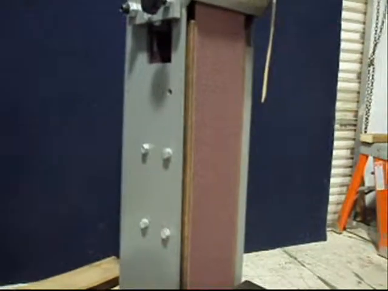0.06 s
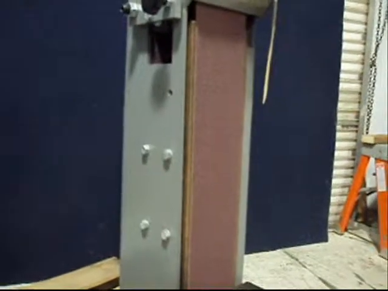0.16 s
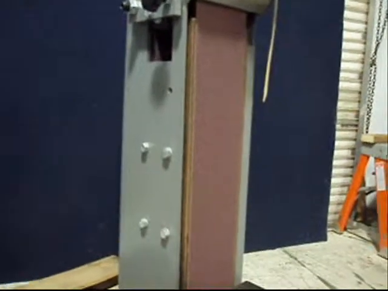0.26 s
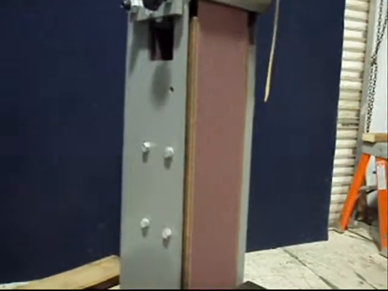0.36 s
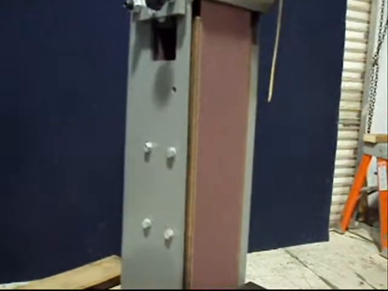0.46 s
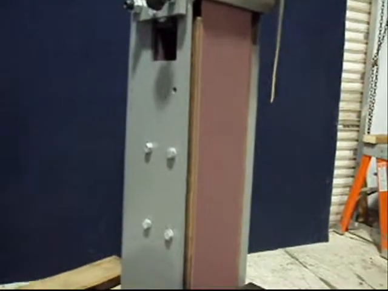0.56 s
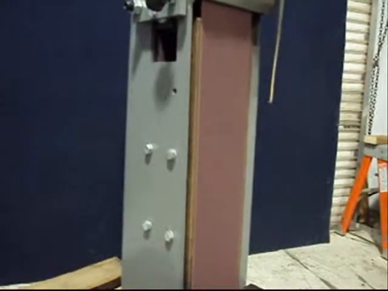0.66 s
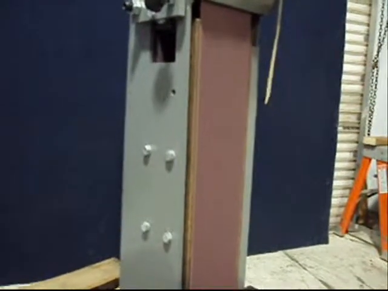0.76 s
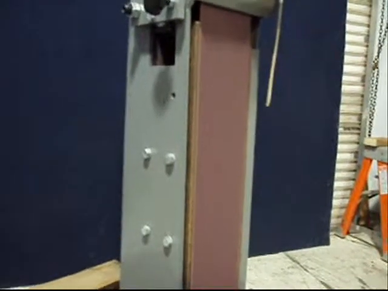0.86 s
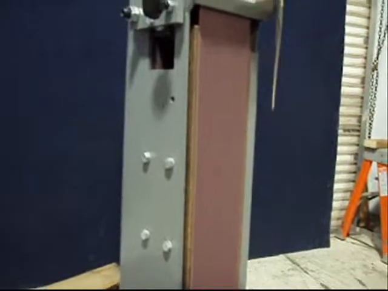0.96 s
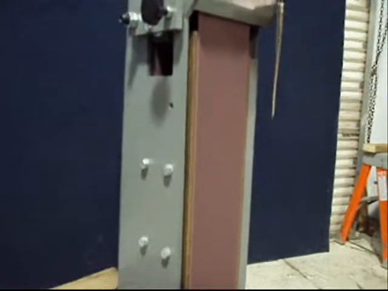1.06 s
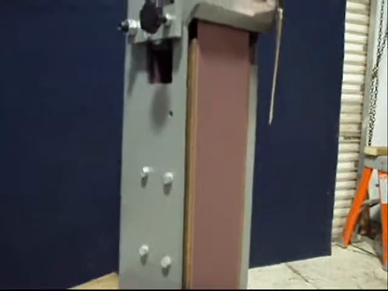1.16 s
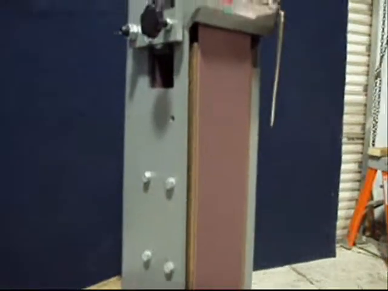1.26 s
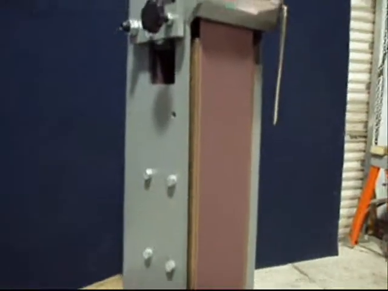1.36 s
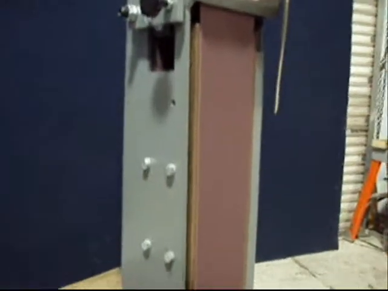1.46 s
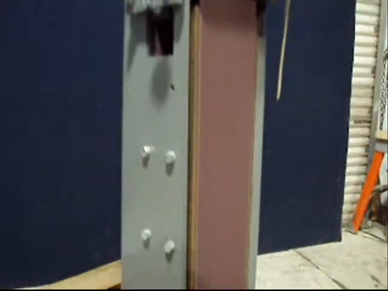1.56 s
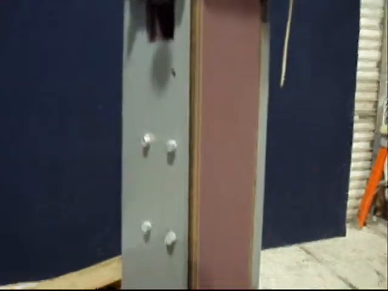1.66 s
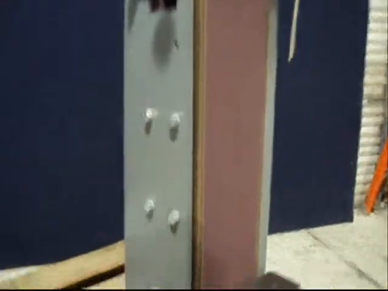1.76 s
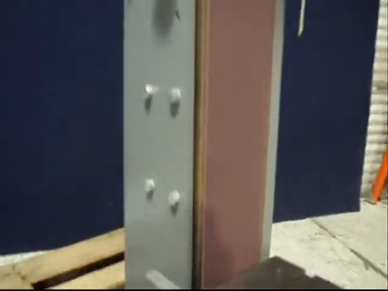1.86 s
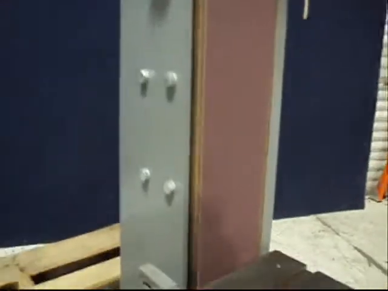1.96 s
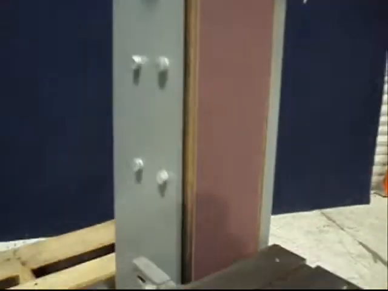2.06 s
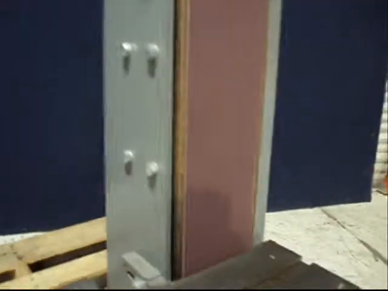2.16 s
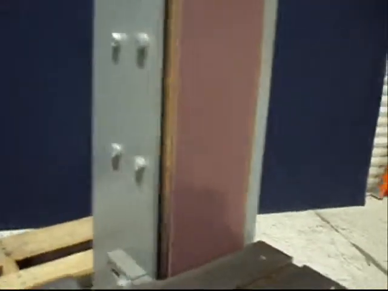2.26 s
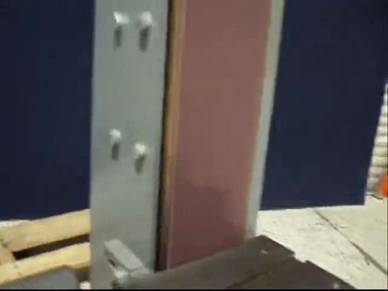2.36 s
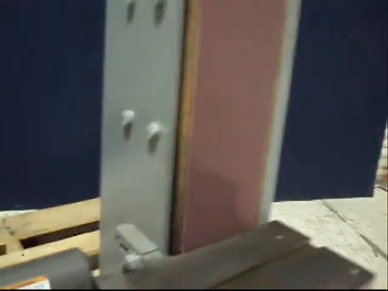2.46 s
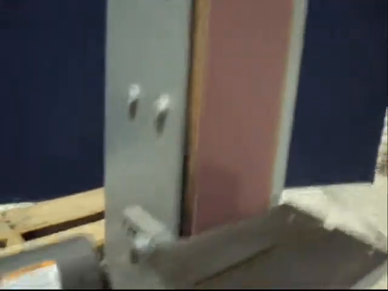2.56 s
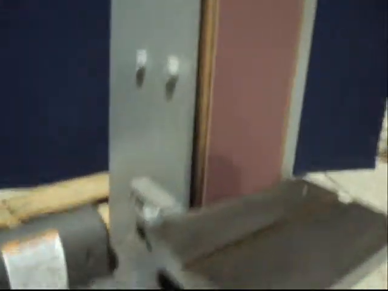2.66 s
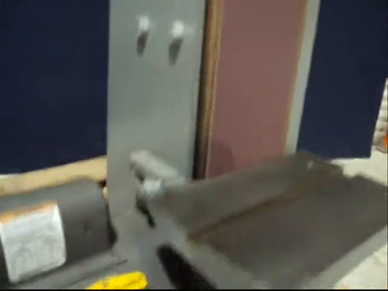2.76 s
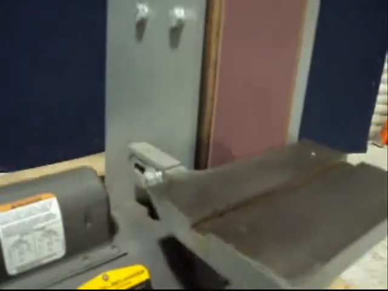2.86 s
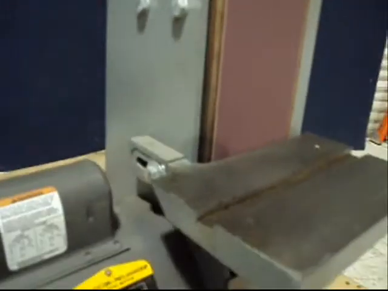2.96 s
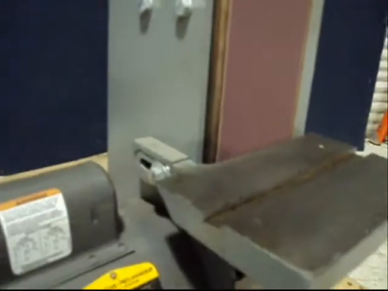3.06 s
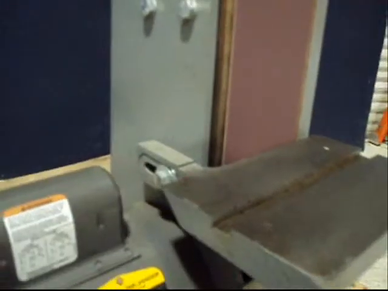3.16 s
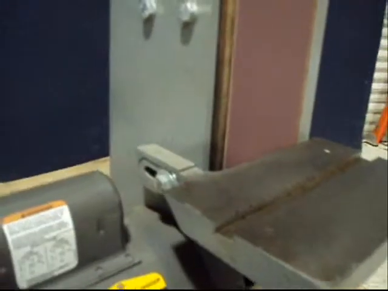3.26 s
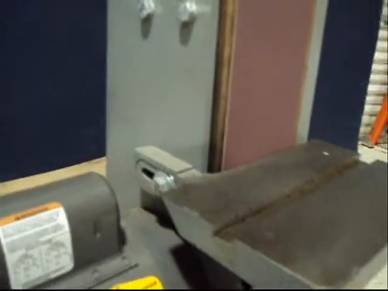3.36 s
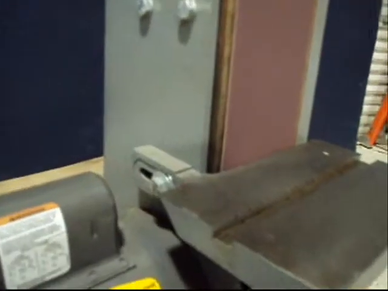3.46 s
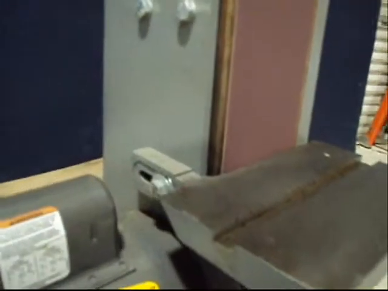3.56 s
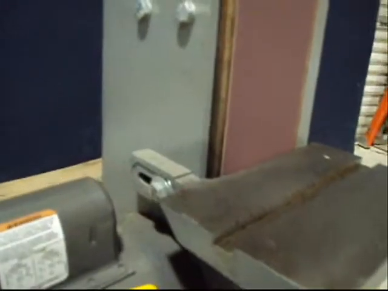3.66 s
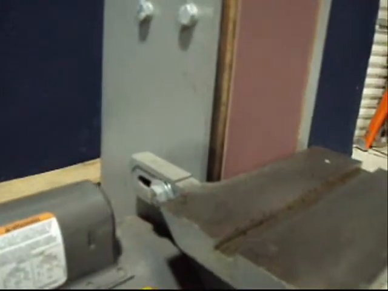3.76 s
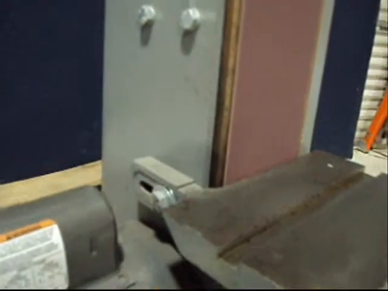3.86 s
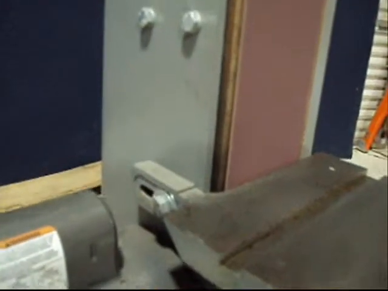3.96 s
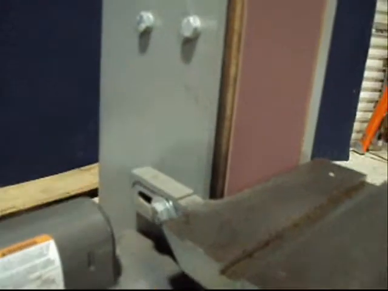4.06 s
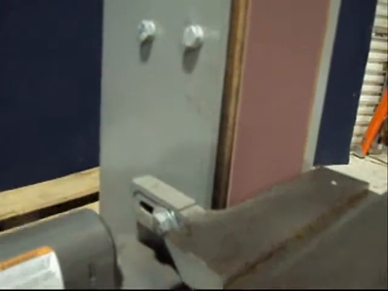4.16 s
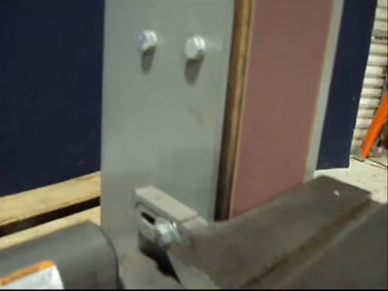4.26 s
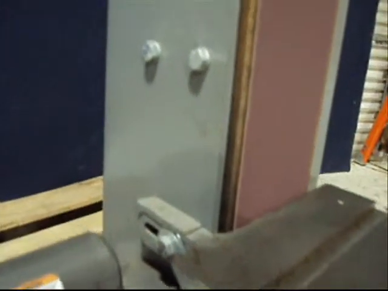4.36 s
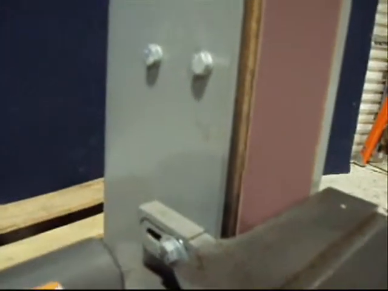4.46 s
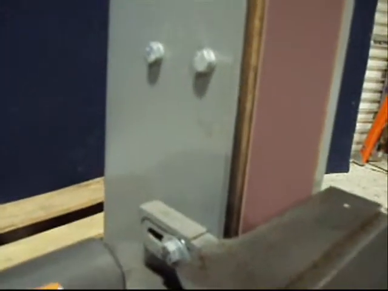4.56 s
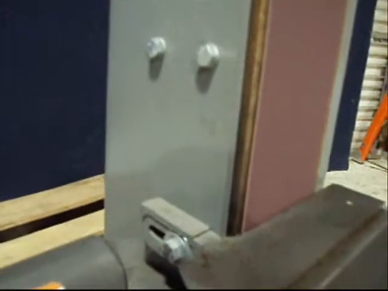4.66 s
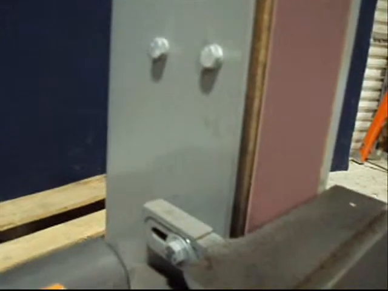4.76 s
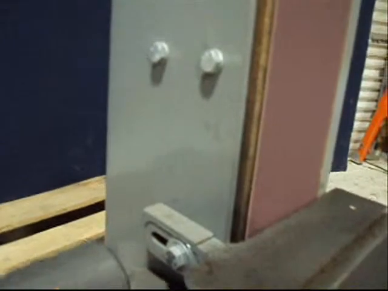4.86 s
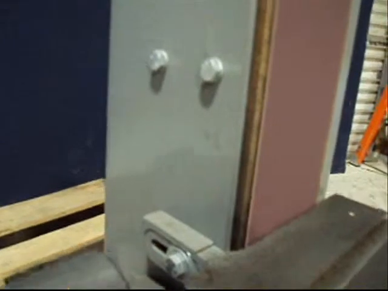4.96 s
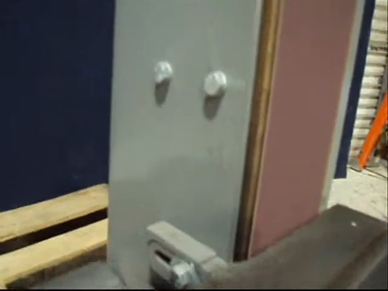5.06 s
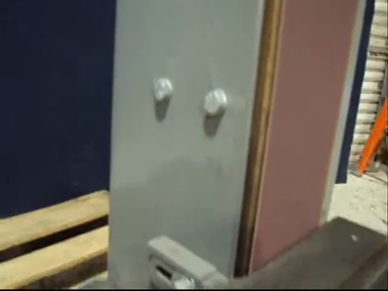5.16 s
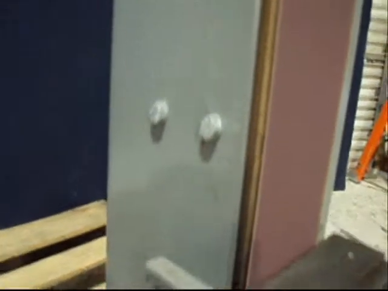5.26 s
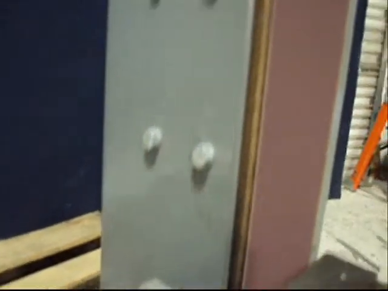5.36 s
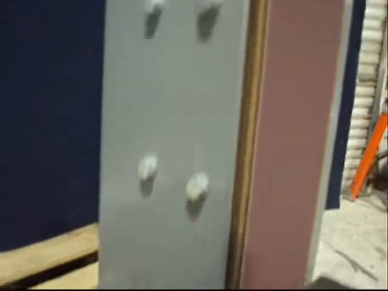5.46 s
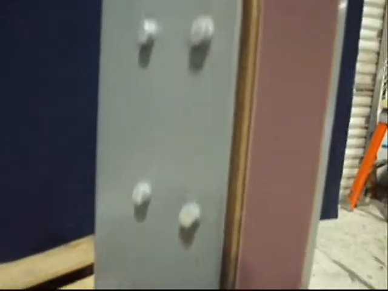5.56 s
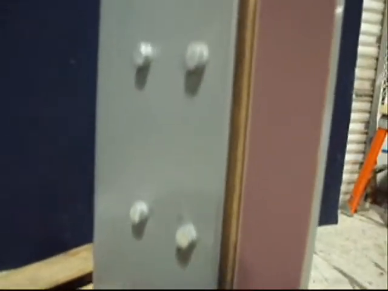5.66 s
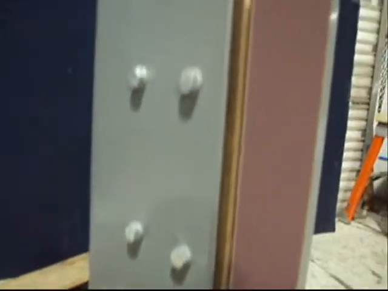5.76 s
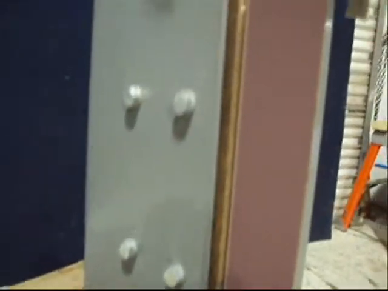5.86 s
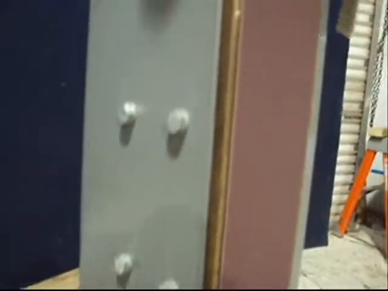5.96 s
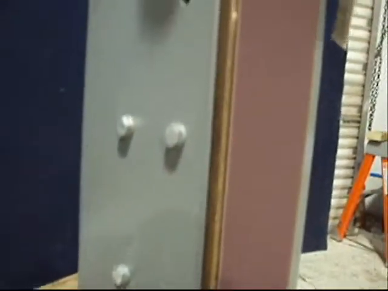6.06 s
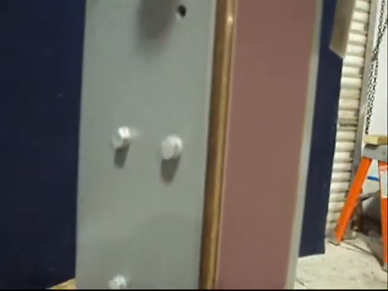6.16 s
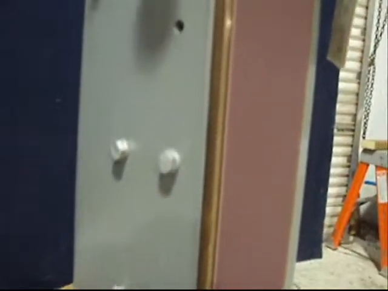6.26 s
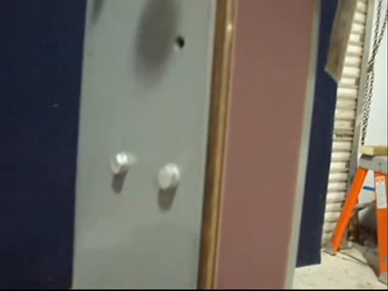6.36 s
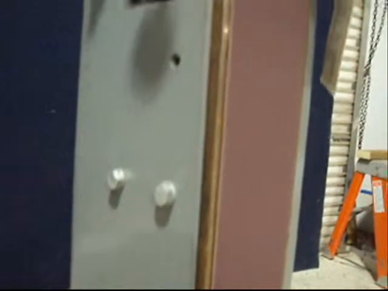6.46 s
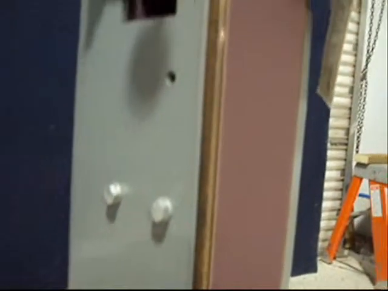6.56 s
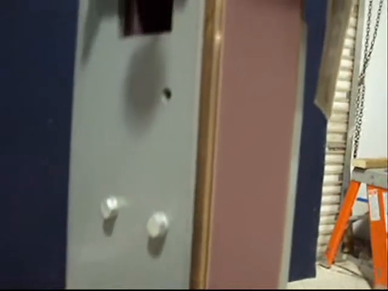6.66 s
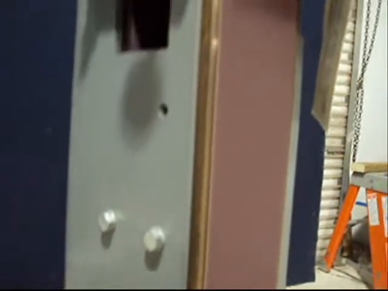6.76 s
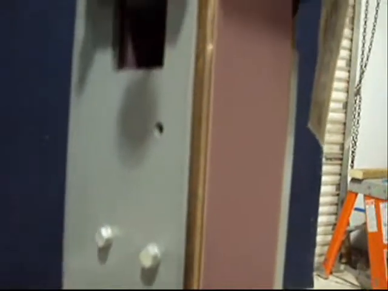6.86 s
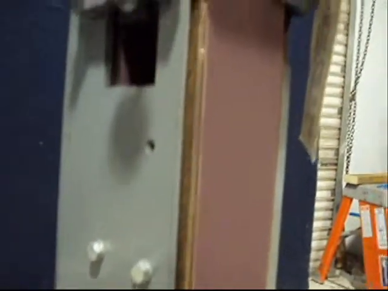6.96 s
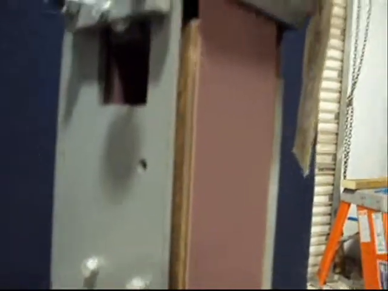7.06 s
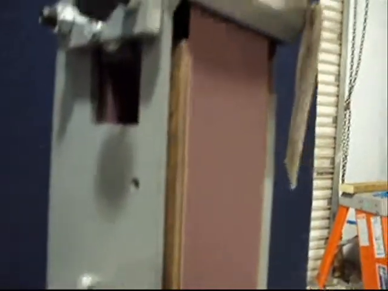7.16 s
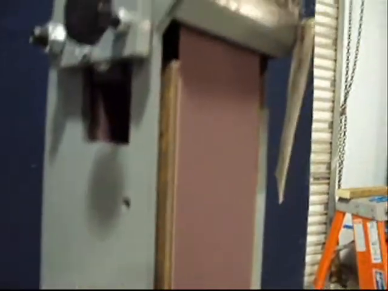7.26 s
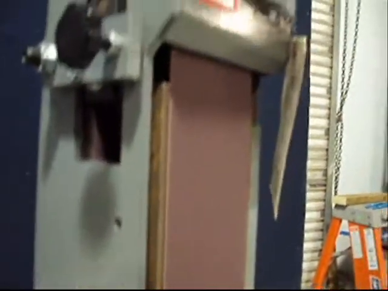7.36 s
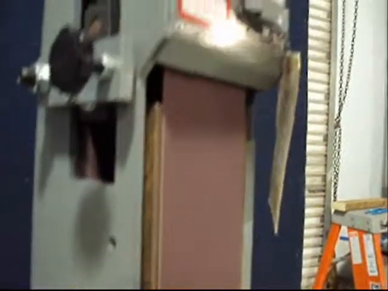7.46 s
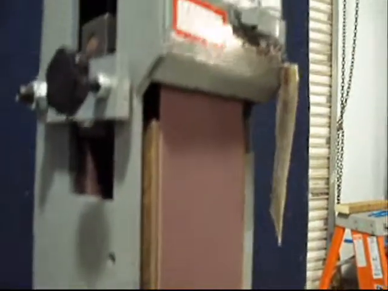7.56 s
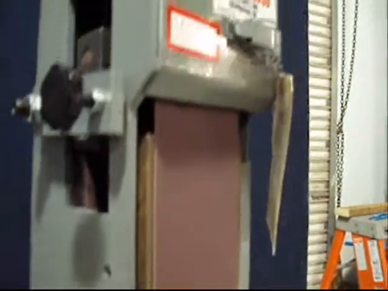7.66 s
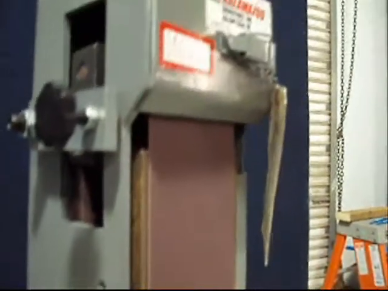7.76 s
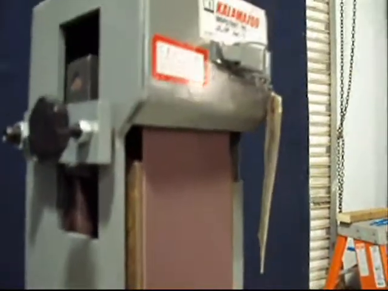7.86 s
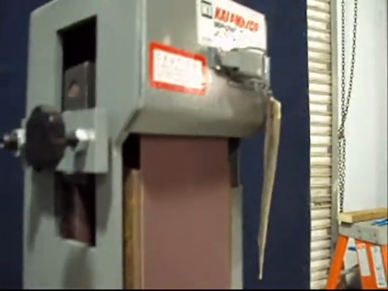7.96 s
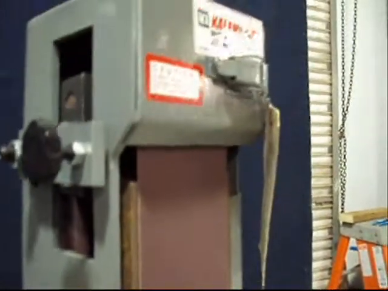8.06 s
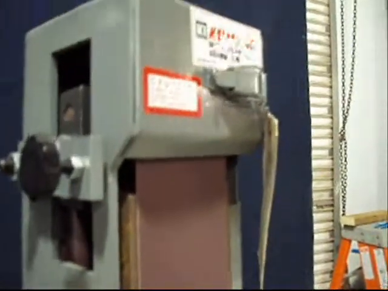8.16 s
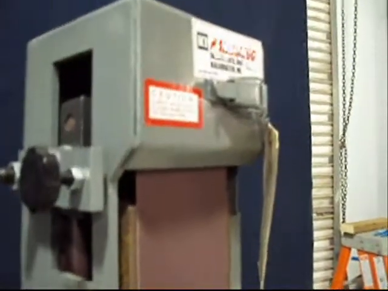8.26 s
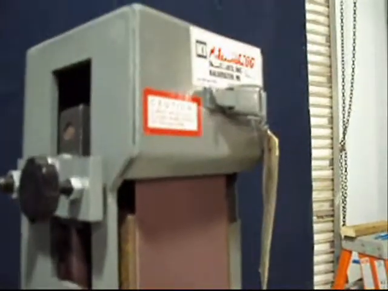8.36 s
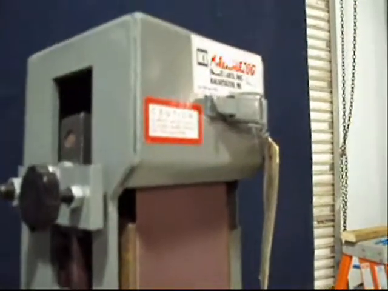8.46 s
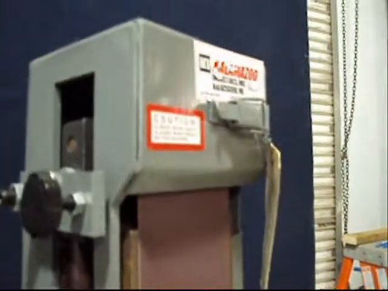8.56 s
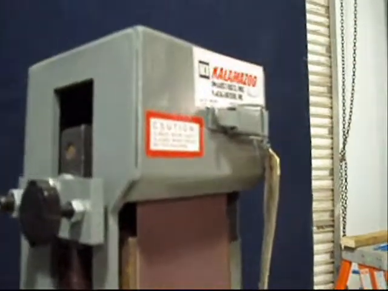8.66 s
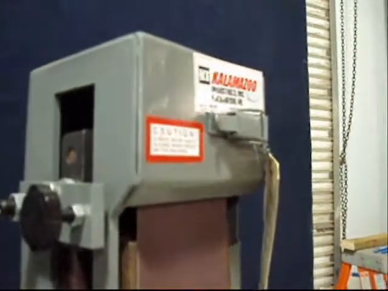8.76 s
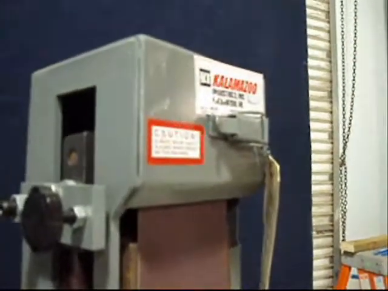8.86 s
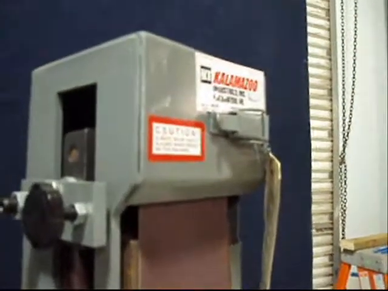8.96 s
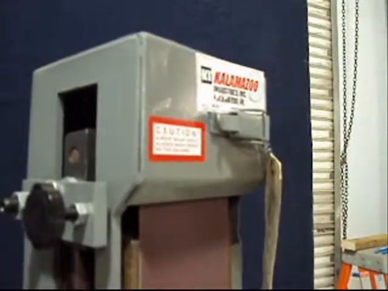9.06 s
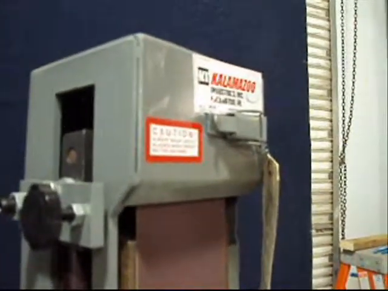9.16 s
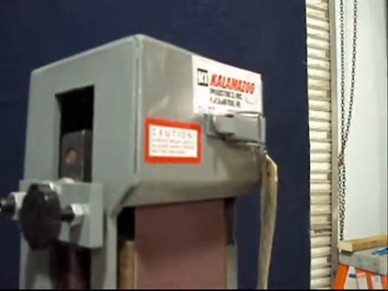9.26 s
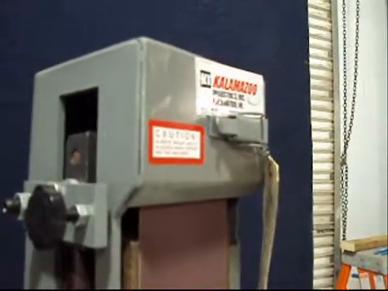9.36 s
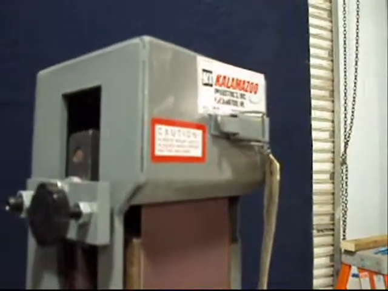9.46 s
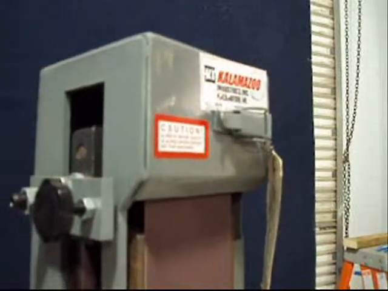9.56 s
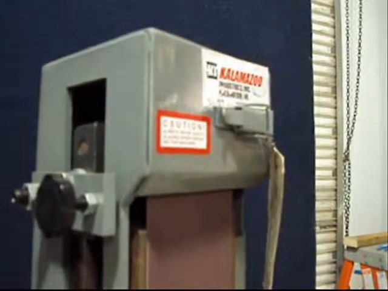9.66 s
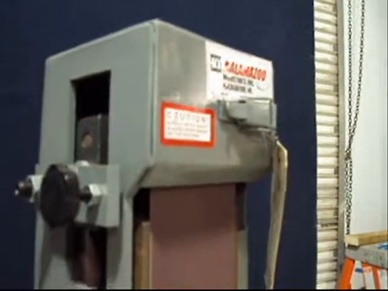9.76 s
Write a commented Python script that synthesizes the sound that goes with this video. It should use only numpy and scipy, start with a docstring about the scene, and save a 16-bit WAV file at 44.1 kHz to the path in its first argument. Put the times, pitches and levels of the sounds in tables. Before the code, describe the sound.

A belt sander snaps on and runs steadily with a whirring hum, gritty hiss and rhythmic slapping of the belt, in a workshop.

```python
"""An upright belt sander in a workshop, on a small camera's microphone 0.6 to 1.3 m away.
Ventilation first; at 0.3 s the switch snaps, then the drive belt moans and the sanding belt knocks twice.
From 0.7 s it runs free: the belt's grain repeats every loop, its splice slaps the platen at both
pulleys, and fan and idler sing over it. The microphone dips to the motor, then rises to the hood.
Throughout, the camera holds each quarter-rate sample, which mirrors the sound into a gritty treble."""
import sys
import numpy as np
from scipy import signal
from scipy.fft import rfft, irfft, next_fast_len
from scipy.io import wavfile
from scipy.ndimage import uniform_filter1d, map_coordinates

SR = 44100
rng = np.random.default_rng(int(sys.argv[2]) if len(sys.argv) > 2 else 0)


def master(y):
    """Save y as 16-bit WAV."""
    cut = np.clip(np.atleast_2d(y).T, -1, 1)
    pcm = np.round(cut * 32767)  # scale
    wavfile.write(sys.argv[1], SR, pcm.astype(np.int16))


N = 431738
T = np.arange(N) / SR
LOOP_HZ = 12.435  # belt loops a second at full speed
# the microphone's path: time_s, height (0 at the motor, 1 at the hood), distance_m
MIC_PATH = [(0, 0.52, 1.27), (1.6, 0.56, 1.28), (2.8, 0.22, 0.77), (4.3, 0.09, 0.62), (5.2, 0.23, 0.64),
            (6, 0.81, 0.75), (7, 0.85, 0.68), (8.3, 1, 0.82), (9.79, 1, 0.92)]


def undb(db):
    """Decibels to gain."""
    return 10 ** (np.asarray(db) / 20)


def unit(x):
    """Scale to rms 1."""
    return x / np.sqrt(np.mean(x ** 2))


def curves(table):
    """Each column of a time table, sample by sample."""
    times_s, *columns = np.transpose(table)
    return [np.interp(T, times_s, column) for column in columns]


def colour(x, outline):
    """Filter by an outline (freq_hz, level_db) that falls away at both ends; rms 1."""
    hz, db = np.transpose(outline)
    size = next_fast_len(N)
    bin_hz = np.maximum(np.arange(size // 2 + 1) * SR / size, 1)
    gain = undb(np.interp(np.log(bin_hz), np.log(hz), db, left=-80, right=-80))
    return unit(irfft(rfft(x, size) * gain, size)[:N])


def walk(rate_hz):
    """Smooth random drift with a spread near 1."""
    knots = rng.standard_normal(1024)
    position = np.arange(N // 64 + 2) * 64 * rate_hz / SR
    return map_coordinates(knots, [position], mode="wrap").repeat(64)[:N]


def burst(start_s, decay_s, outline):
    """Coloured noise that starts near rms 1 and dies away."""
    fade = (T > start_s) * np.exp(-np.abs(T - start_s) / decay_s)
    return colour(rng.standard_normal(N) * fade, outline) * np.sqrt(np.mean(fade ** 2))


def no_bass(x, hz):
    """Small plates radiate little below hz."""
    return signal.sosfilt(signal.butter(3, hz, "high", fs=SR, output="sos"), x)


def at_mic(db, closer_db, place, away_db):
    """Gain: db at 1 m, plus closer_db per halved distance, less away_db per unit of height off place."""
    height, distance_m = curves(MIC_PATH)
    return undb(db - closer_db * np.log2(distance_m) - away_db * np.abs(height - place))


def turns(speed, hz):
    """Turns made by a part that runs at hz when up to speed."""
    lag_s = np.cumsum(speed - 1) / SR
    return hz * (T + lag_s - lag_s[-1])


def tones(angle, table, height, waver_db, scatter=1):
    """Partials wavering in the room's standing waves; with little phase scatter they throb each turn."""
    out = 0
    for multiple, motor_db, hood_db in table:
        gain = undb(motor_db + (hood_db - motor_db) * height + waver_db * walk(2.15))
        out = out + gain * np.sin(2 * np.pi * (multiple * angle + scatter * rng.random()))
    return np.sqrt(2) * out


def ventilation():
    """Room tone: the workshop's steady ventilation noise."""
    # its spectrum: freq_hz, level_db
    outline = [(30, -25), (140, -17), (210, -11), (400, -2), (700, -3.5), (840, -2), (1500, -7.5),
               (2100, -10), (2500, -26), (3250, -20.5), (4050, -29.5), (5600, -35)]
    return colour(rng.standard_normal(N), outline) * undb(-36 + .5 * walk(31))


def switch():
    """The contacts snap shut and bounce in their metal box; the shop rings on briefly."""
    # closing and bounces: start_s, level_db
    contacts = [(.2908, -14), (.2942, -15.5), (0.301, -17), (0.3073, -21)]
    # the box's ring: pitch_hz, level_db, t60_s
    box_modes = [(872, -11, .035), (1141, -9, .03), (1314, -1, .04), (1480, 0, .03), (1653, -1, .04),
                 (1922, -4, .05), (2150, -7, .055), (2643, -15, .035), (2907, -17, .015)]
    t = T[:SR // 2]
    clicks = np.zeros(N)
    for start_s, level_db in contacts:
        ring = sum(undb(db) * rng.choice([-1, 1]) * np.sin(2 * np.pi * hz * t) * undb(-60 * t / t60)
                   for hz, db, t60 in box_modes)
        start = int(start_s * SR)
        clicks[start:start + len(t)] += undb(level_db - 7.5) * ring
    outline = [(200, -27), (500, -3), (1400, 1), (2100, -2), (2900, -26), (4200, -23), (5600, -18)]
    snap_s = contacts[0][0]
    crack = burst(snap_s, .0087, outline) * undb(-24)
    tail = burst(snap_s, .13, outline) * undb(-32)
    return no_bass(clicks, 700) + crack + tail


def moan_and_knocks():
    """The drive belt slips and moans amid two run-up knocks; near 6 s the splice hits hardest, thrice."""
    # two knocks in the run-up, then three splice blows on the platen: start_s, pitch_hz, level_db
    knocks = [(.534, 1900, -20.5), (.581, 1080, -17.5), (5.829, 850, -13), (6.313, 850, -16),
              (6.554, 800, -15)]
    slip_s, width_s = .524, .061
    swell = np.exp(-.5 * ((T - slip_s) / width_s) ** 2)
    moan = colour(rng.standard_normal(N), [(500, -41), (670, -4), (730, -2), (790, 0), (1000, -26)])
    # a knock's spectrum: pitch_ratio, level_db
    ring = np.array([(.35, -35), (.85, -12), (1, 0), (1.2, -16), (2, -40)])
    knocking = sum(burst(start_s, .0068, ring * [hz, 1]) * undb(db) for start_s, hz, db in knocks)
    return moan * undb(-28) * swell + knocking


def motor(speed, height):
    """Seven fan blades give a tone and its fluttering octave; shaft and idler hum; cooling air rumbles."""
    # the blade tone in the shop's standing waves: time_s, level_db
    blade_levels = [(0.75, -31.5), (1.35, -35.5), (1.7, -29.5), (2.6, -32), (2.9, -26), (4.86, -24),
                    (7.2, -27), (7.7, -29), (9.3, -31), (9.7, -29.5)]
    # shaft and idler partials: multiple, at_motor_db, at_hood_db
    shaft_partials = [(1, -61, -65), (2, -54, -58), (13, -39, -37), (21, -41, -42), (39, -51, -53)]
    idler_partials = [(3, -36.5, -46), (3.84, -45, -50), (12, -34, -39)]
    shaft, idler = turns(speed, hz=59.65), turns(speed, hz=71.08)
    blade_phase = 2 * np.pi * 7 * shaft
    blade_db = curves(blade_levels)[0] - .5 + 1.8 * height * walk(18)  # less steady away from the motor
    tone = undb(blade_db) * np.sin(blade_phase + .08 * walk(6))
    octave = undb(2.5 * walk(25)) * np.sin(2 * blade_phase + .6 * walk(14))
    octave *= at_mic(-32, closer_db=7, place=.93, away_db=10)
    hum = tones(shaft, shaft_partials, height, waver_db=-1.5)
    hum += tones(idler, idler_partials, height, waver_db=1.5)
    hum *= at_mic(-.5, closer_db=6.5, place=.5, away_db=3.5)
    air_outline = [(25, -21), (60, -15), (110, -15), (160, -1.5), (210, 1), (400, -19)]
    air = colour(rng.standard_normal(N), air_outline) * at_mic(-40.5, closer_db=4, place=-1, away_db=4)
    return (np.sqrt(2) * (tone + octave) + hum + air) * speed ** 6


def strike(loops, share, modes, scatter_db, polarity=1):
    """One blow a loop, uneven in force; with polarity -1 neighbouring modes oppose and the ring blooms."""
    lap, part = np.divmod(loops - share, 1)
    since_s = part / LOOP_HZ
    force_db = scatter_db * rng.standard_normal(256)[lap.astype(int) % 256]
    ring = sum(undb(db - 60 * since_s / t60) * np.sin(2 * np.pi * hz * since_s) * polarity ** k
               for k, (hz, db, t60) in enumerate(modes))
    return no_bass(ring * undb(force_db), 350)


def splice(speed):
    """The belt's joint knocks on the platen at both pulleys, in spells, and ticks under the hood."""
    # the struck platen and the short, hard tick: pitch_hz, level_db, t60_s
    platen_modes = [(815, -7, .045), (985, -4, .028), (1085, -1, .035), (1175, -2, .032), (1830, -10, .035)]
    tick_modes = [(600, -7, .012), (850, -4, .012), (1120, -3, .012), (1340, -3, .012), (1850, -3, .016)]
    # strength of the blows: time_s, first_db, second_db, tick_db
    blow_levels = [(.7, -17, -21, -40), (1.9, -16, -20, -40), (2.4, -13.5, -15, -36), (2.9, -22, -22, -28),
                   (5.1, -22, -22, -22), (5.8, -11, -20, -24), (6.7, -12, -19, -24), (7.3, -23, -24, -19),
                   (8.2, -23, -28, -12.5), (9.79, -23, -28, -14)]
    first_db, second_db, tick_db = curves(blow_levels)
    loops = turns(speed, LOOP_HZ) - .006 * T  # the blows creep later in the loop
    first = strike(loops, .41, platen_modes, scatter_db=1.6, polarity=-1) * undb(first_db)
    second = strike(loops, .9, platen_modes, scatter_db=2.5, polarity=-1) * undb(second_db)
    rebound = strike(loops, 0, platen_modes, scatter_db=2.5, polarity=-1) * undb(second_db - 2)
    tick = strike(loops, .535, tick_modes, scatter_db=2) * undb(tick_db)
    return (first + second + rebound + tick) * speed ** 6


def resonances(loops, height, slap):
    """Belt harmonics meet resonances: some throb each loop, slaps kick weaker ones, the whine flickers."""
    # harmonics in each resonance: loop_multiple, at_motor_db, at_hood_db
    platen_boom = [(64, -16, -5), (66, -2, -1), (67, -6, -12), (68, -11, -14)]
    top_roller = [(84, -17, -17), (85, -8, -7), (86, -2, -1), (87, -10, -10)]
    bearing_whine = [(252, -13, -12), (253, -1, -1), (256, -12, -11)]
    frame_thrum = [(31, -45, -39), (32, -43, -40), (33, -44, -42)]
    hood_chime = [(142, -39, -34), (144, -41, -39), (145, -36, -34), (146, -39, -37), (147, -41, -41)]
    weak_rings = [(22, -41, -44), (40, -39, -38), (41, -42, -44), (42, -52, -39), (44, -51, -37),
                  (46, -52, -40), (50, -45, -40), (70, -42, -45), (77, -36.5, -43), (83, -44, -44),
                  (92, -38, -37), (101, -39, -41), (130, -39, -47), (132, -44, -45), (163, -44, -41)]
    # three come and go as the microphone moves: time_s, level_db
    boom_levels = [(1.6, -51), (2.4, -30), (3, -30.5), (4.3, -26.5), (5, -27.5), (5.6, -25.5), (6.4, -26.5),
                   (7.2, -35), (8, -36.5), (9.79, -30.5)]
    roller_levels = [(.7, -40), (2.6, -41), (4.3, -45), (5.5, -38), (6.2, -30), (7, -28.5), (8.2, -29),
                     (9.79, -30)]
    whine_levels = [(1.5, -60), (2.3, -52), (3.8, -59), (4.5, -48), (5.4, -48), (5.9, -40), (6.4, -49),
                    (6.7, -45), (7.1, -41.5), (7.8, -52)]

    def throb(table, share):
        """Harmonics nearly in phase swell together at this share of the loop."""
        return tones(loops - share, table, height, waver_db=1.2, scatter=.08)

    boom = throb(platen_boom, .05) * undb(curves(boom_levels)[0])
    roller = throb(top_roller, .09) * undb(curves(roller_levels)[0] + 1.5 * walk(13))
    whine = tones(loops, bearing_whine, height, waver_db=1.5)
    whine *= undb(curves(whine_levels)[0] + 3.5 * walk(11))
    kicked = tones(loops, weak_rings, height, waver_db=1.5) * unit(1 + .5 * slap)
    others = kicked + throb(frame_thrum, .65) + throb(hood_chime, .82)
    return boom + roller + whine + others * at_mic(-2, closer_db=3, place=0, away_db=-2)


def slapping(loops, height, decay_s, scatter_db):
    """Strength of the flapping belt: each slap jumps up and dies away, never twice quite alike."""
    # slaps within one loop: loop_share, at_motor_db, at_hood_db
    slaps = [(.06, -1, -3), (.125, -5, -3), (.38, -6, -5), (.52, -4, -6), (.585, -3, -1), (.98, -8, -7)]
    strength = 0
    for share, motor_db, hood_db in slaps:
        lap, part = np.divmod(loops - share, 1)
        chance = rng.standard_normal(256)[lap.astype(int) % 256]
        force = undb(motor_db + (hood_db - motor_db) * height + scatter_db * chance)
        strength = strength + force * np.exp(-part / LOOP_HZ / decay_s)
    return unit(uniform_filter1d(strength, size=24))


def surface(loops, patchy_db):
    """The same train of grains comes round every loop, strong at some spacings, weak at others."""
    size = 3546  # samples in one loop
    bins = size // 2 + 1
    patches = np.sqrt(3) * uniform_filter1d(rng.standard_normal(bins), size=3)
    bumps = irfft(undb(patchy_db * patches) * np.exp(2j * np.pi * rng.random(bins)), size)
    return unit(np.interp(loops % 1 * size, np.arange(size + 1), np.append(bumps, bumps[0])))


def rub(loops, speed, repeat, wander, patchy_db):
    """Belt on steel: repeating bumps that change as the belt wanders sideways, and fresh friction noise."""
    repeating = repeat * speed
    track = surface(loops, patchy_db)
    track += wander * sum(walk(1.202) * surface(loops, patchy_db) for _ in range(2))
    track /= np.sqrt(uniform_filter1d(track ** 2, size=SR // 3))  # the pressure stays even
    return np.sqrt(repeating) * track + np.sqrt(1 - repeating) * rng.standard_normal(N)


def belt(speed, height):
    """The belt rubs and slaps; frame, platen and hood each radiate their own range."""
    # spectra of the parts and of the belt's hiss: freq_hz, level_db
    frame_band = [(30, -44), (60, -31), (110, -20), (175, -15), (225, -3.5), (270, -3), (315, -5),
                  (385, -1), (450, -3.5), (520, -0.5), (700, -3.5), (850, -16), (1200, -42)]
    platen_band = [(450, -60), (680, -15), (800, 1), (920, -0.5), (1070, 3), (1200, -1.5), (1330, -3.5),
                   (1600, -16.5), (2200, -64)]
    hood_band = [(900, -32), (1350, -6), (1500, -6.5), (1620, 0.5), (1800, -2), (2030, 0.5), (2250, -7.5),
                 (2480, -16), (3300, -51)]
    hood_mode = [(1600, -28), (1750, -6), (1805, 0), (1850, -6), (1980, -28)]  # the sheet metal's strongest mode
    hiss_band = [(1900, -31), (2500, -13), (2750, 1.5), (3120, 4), (3260, 0), (3650, 2.7), (4000, -3),
                 (4450, -5.5), (5000, -5), (5600, -10)]
    sizzle_band = [(4400, -24), (4950, 0), (5600, -1.5)]  # from the top of the platen
    rasp_band = [(3300, -9), (3850, -2), (4100, -2), (4600, -19)]  # the abrasive, beside the table
    loops = turns(speed, LOOP_HZ)
    slap = slapping(loops, height, decay_s=.009, scatter_db=1.3)
    body = rub(loops, speed, repeat=.5, wander=.4, patchy_db=1.5)
    grit = rub(loops, speed, repeat=.62, wander=.7, patchy_db=3.2) * (1 + .12 * slap)
    frame = colour(body * (1 + .29 * slap), frame_band)
    frame *= at_mic(-27, closer_db=4.5, place=1, away_db=1.5)
    platen = colour(body * (1 + .5 * slap), platen_band)
    platen *= at_mic(-25.5, closer_db=2.5, place=-.13, away_db=1)
    hood = colour(grit, hood_band) * at_mic(-26, closer_db=2.5, place=.3, away_db=0)
    clang = colour(body * (1 + .4 * slap), hood_mode) * at_mic(-29.5, closer_db=3, place=4, away_db=3)
    clang *= unit(undb(4.5 * np.cos(2 * np.pi * (loops - .82))))  # swells once a loop
    hiss = colour(grit, hiss_band) * at_mic(-34.5, closer_db=3, place=.22, away_db=3.5)
    sizzle = colour(grit, sizzle_band) * at_mic(-47.5, closer_db=1.5, place=.65, away_db=17)
    rasp = colour(grit, rasp_band) * at_mic(-47, closer_db=11, place=.67, away_db=23)
    rubbing = platen + hood + clang + hiss + sizzle + rasp
    # in the run-up the frame comes in first, the resonances last
    return frame * speed ** .69 + rubbing * speed ** 1.15 + resonances(loops, height, slap) * speed ** 6


def scene():
    """One moving microphone; the sander pulls up to speed in under half a second and stays there."""
    on_s, run_up_s = .29, .41
    speed = np.clip((T - on_s) / run_up_s, 0, 1)
    height, _ = curves(MIC_PATH)
    sander = belt(speed, height) + splice(speed) + motor(speed, height) + moan_and_knocks() + switch()
    return (sander + ventilation())[None]


def record(dry):
    """The camera holds each quarter-rate sample for four, mirroring the sound upward; the top is cut."""
    hold, band_hz, top_hz = 4, 5700, 15750
    band = signal.sosfilt(signal.ellip(8, .2, 60, band_hz, fs=SR, output="sos"), dry)
    held = band[:, ::hold].repeat(hold, axis=1)[:, :N]
    return signal.sosfilt(signal.ellip(14, .2, 80, top_hz, fs=SR, output="sos"), held)


dry = scene()
out = record(dry)
master(out)
```